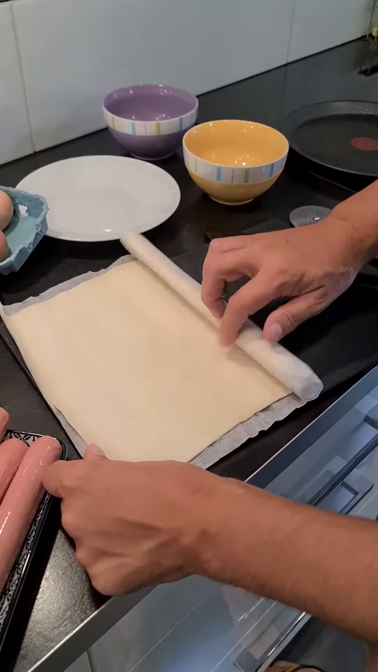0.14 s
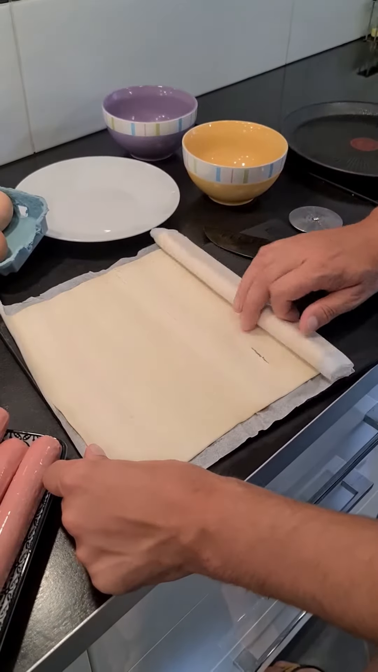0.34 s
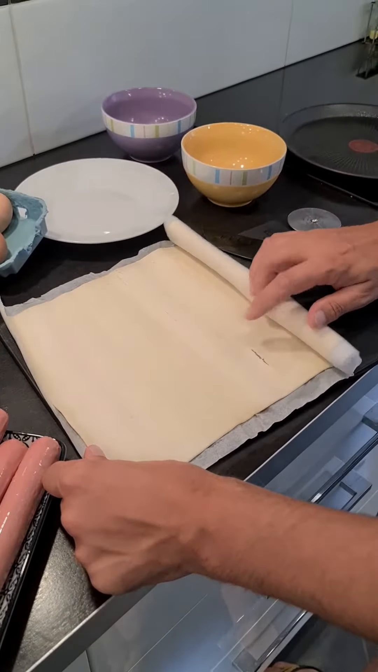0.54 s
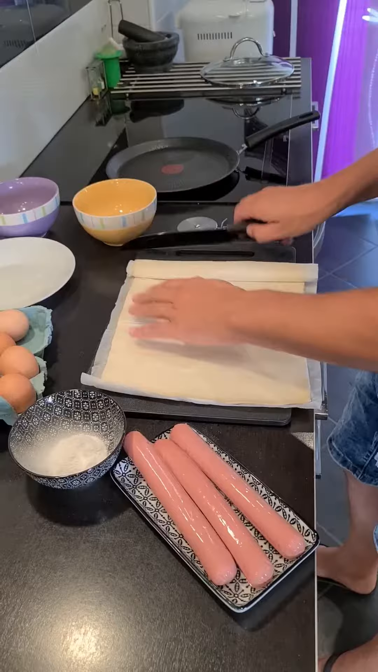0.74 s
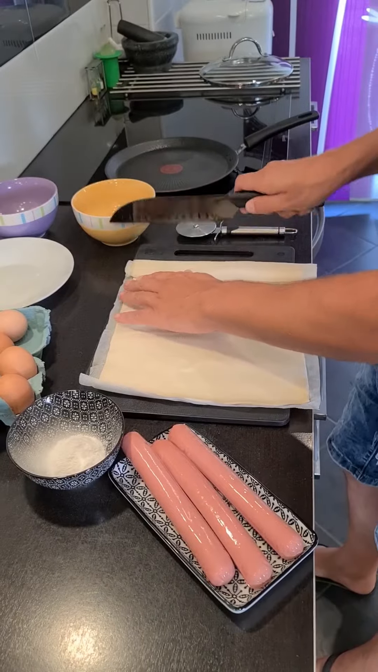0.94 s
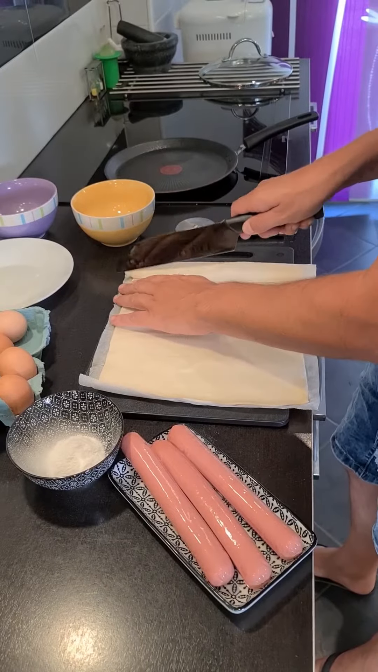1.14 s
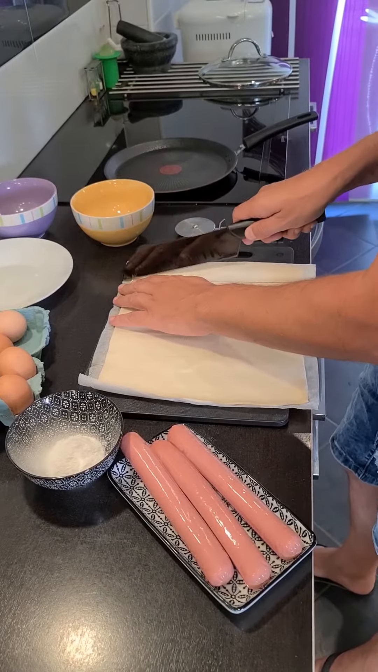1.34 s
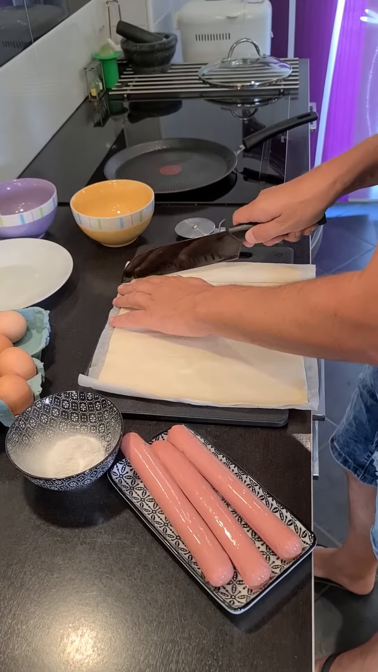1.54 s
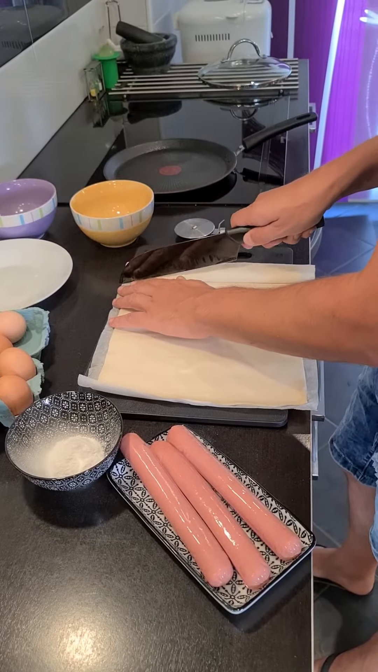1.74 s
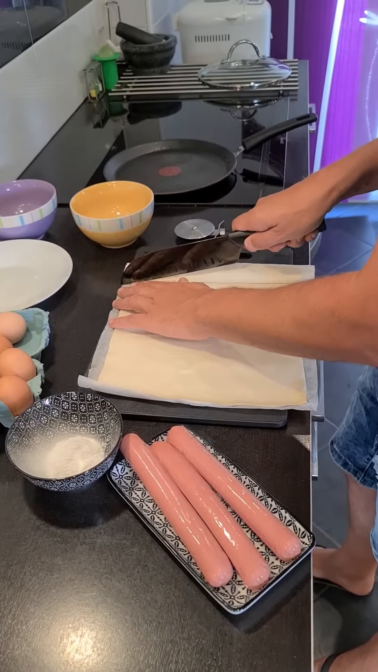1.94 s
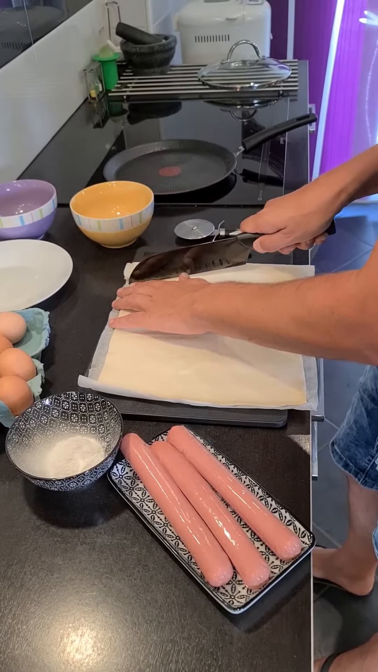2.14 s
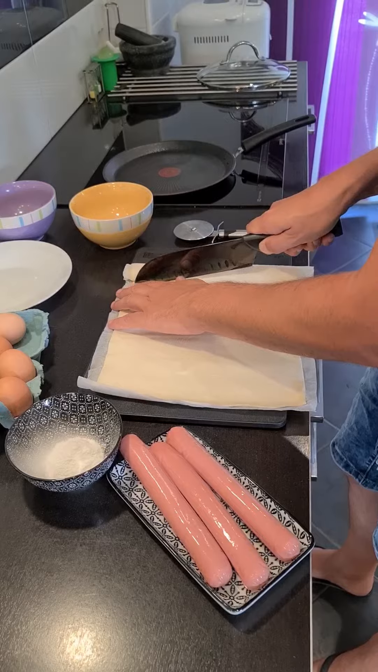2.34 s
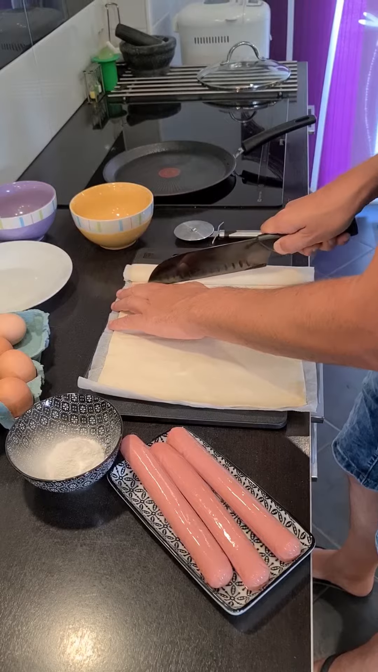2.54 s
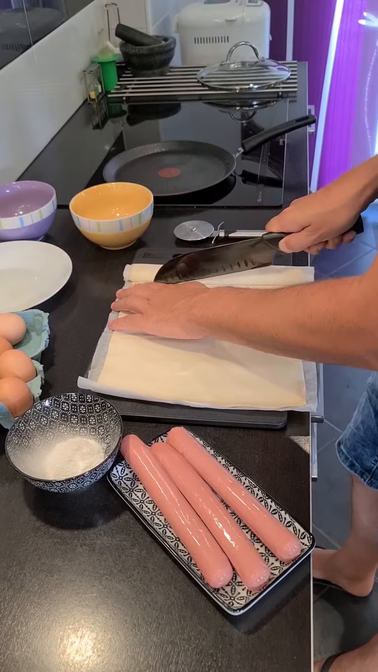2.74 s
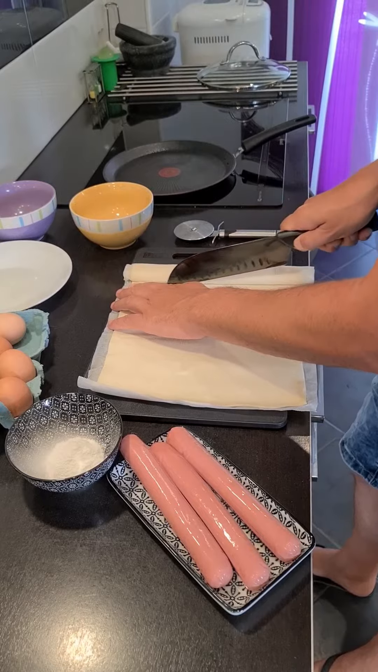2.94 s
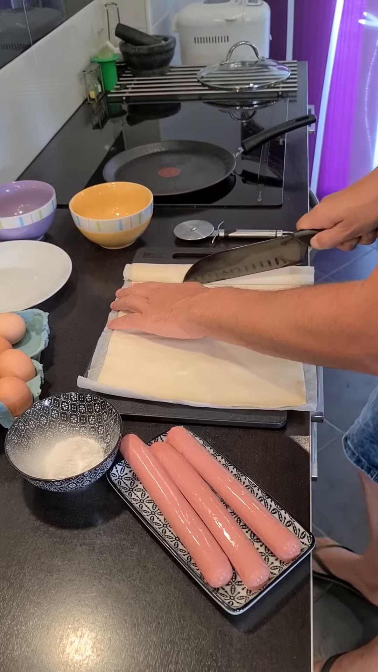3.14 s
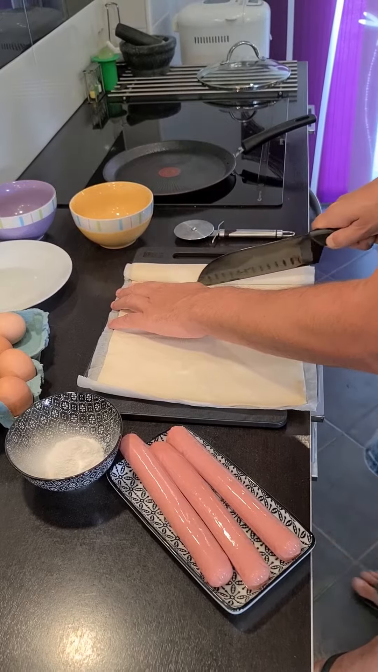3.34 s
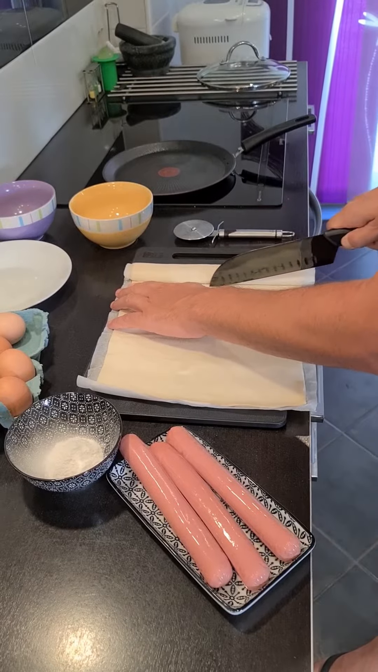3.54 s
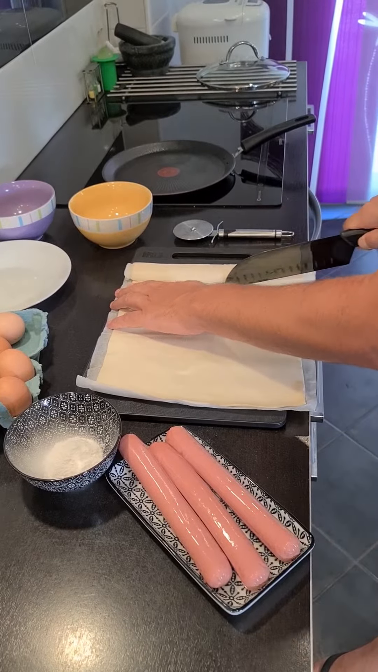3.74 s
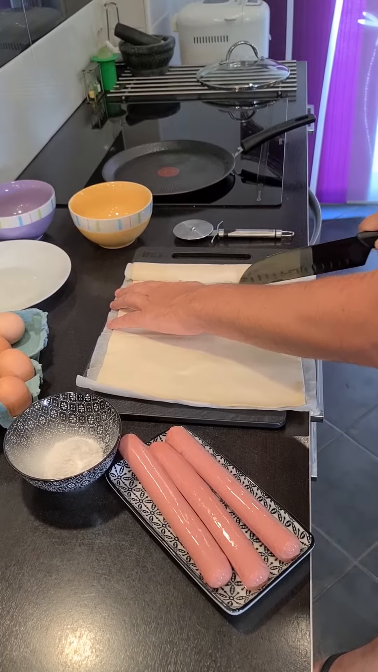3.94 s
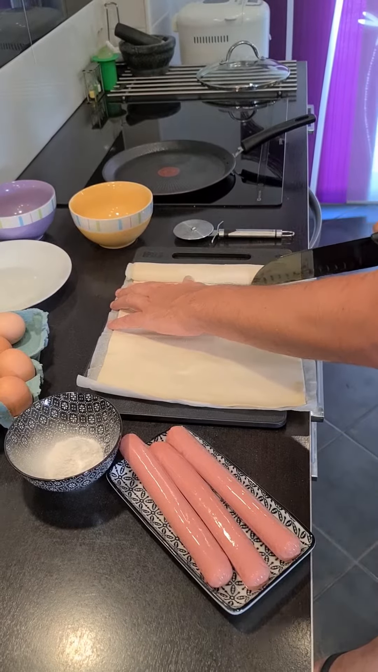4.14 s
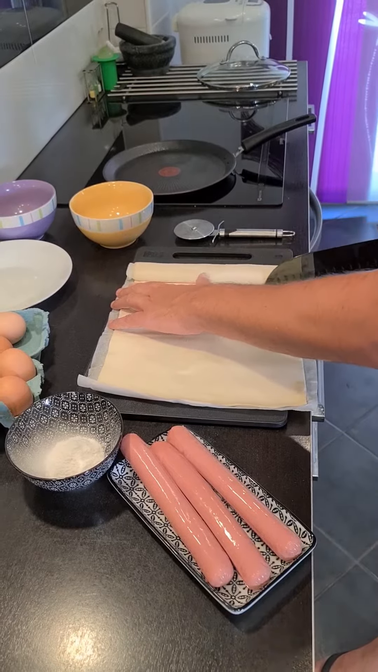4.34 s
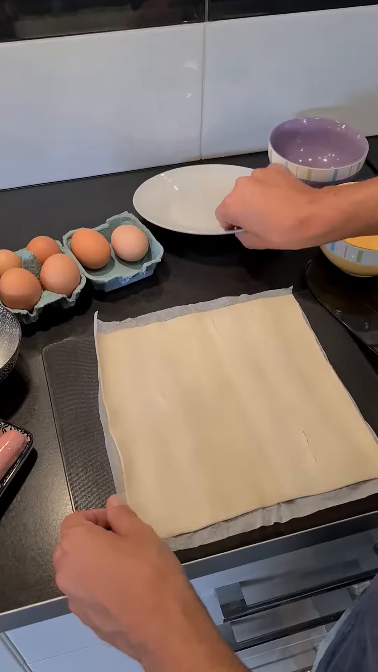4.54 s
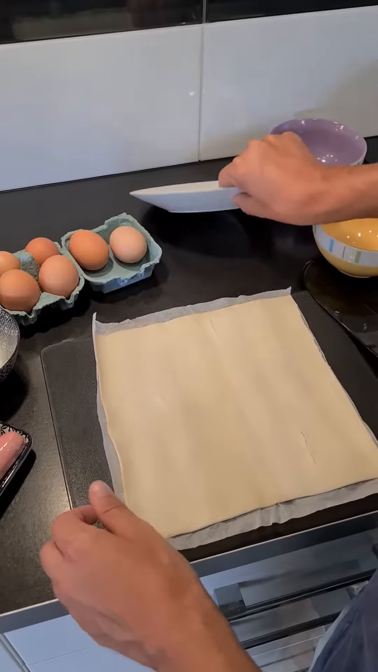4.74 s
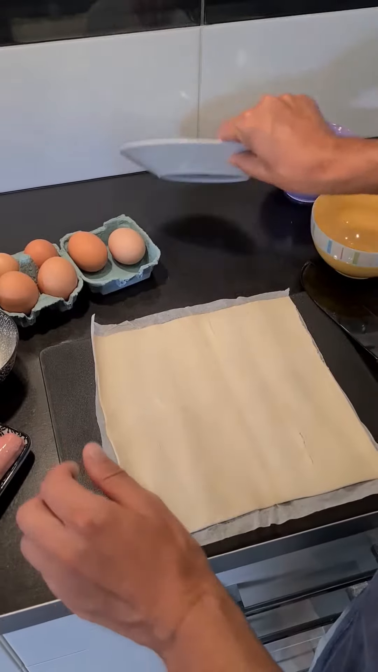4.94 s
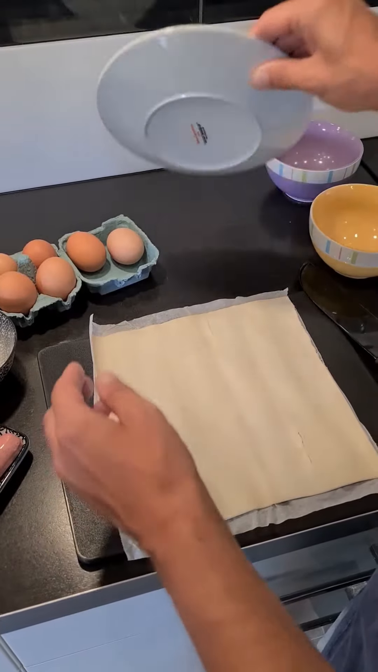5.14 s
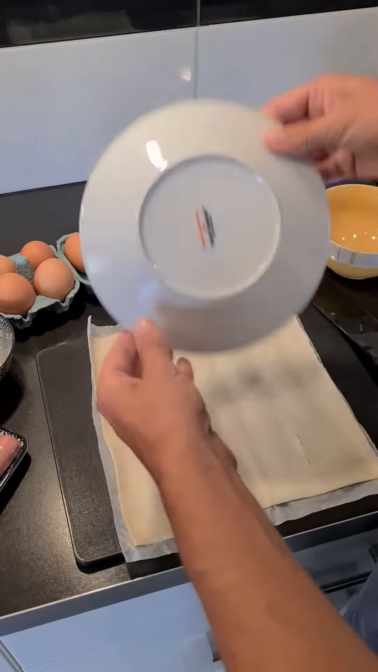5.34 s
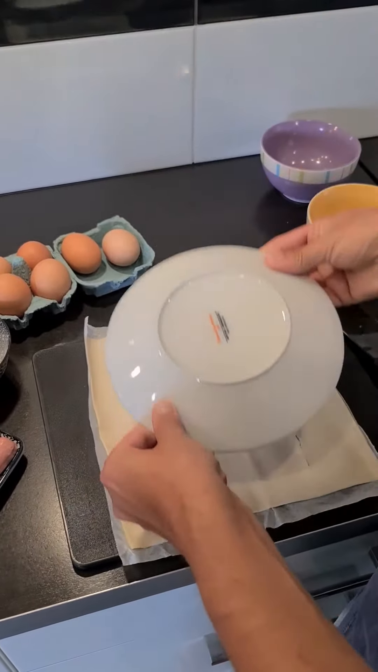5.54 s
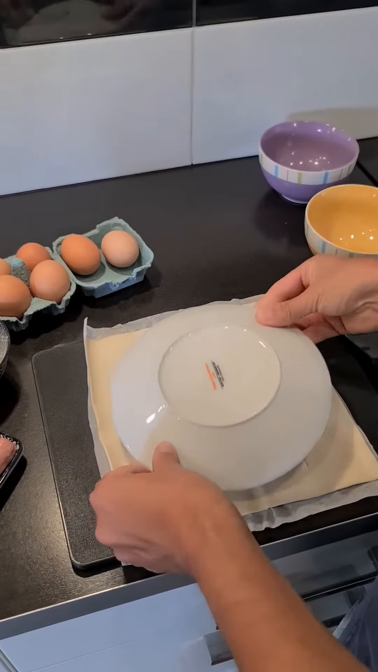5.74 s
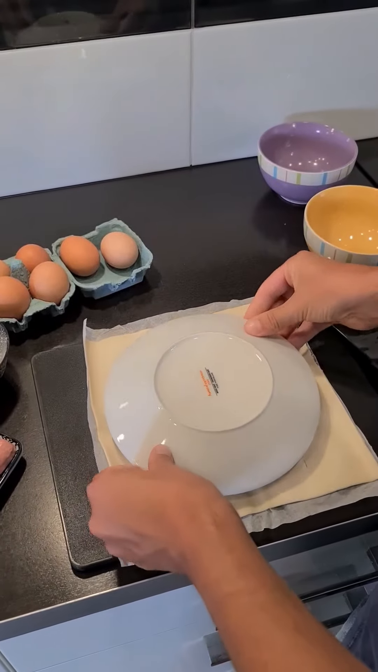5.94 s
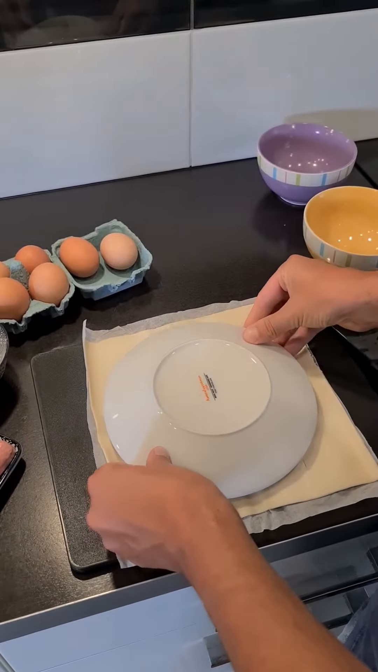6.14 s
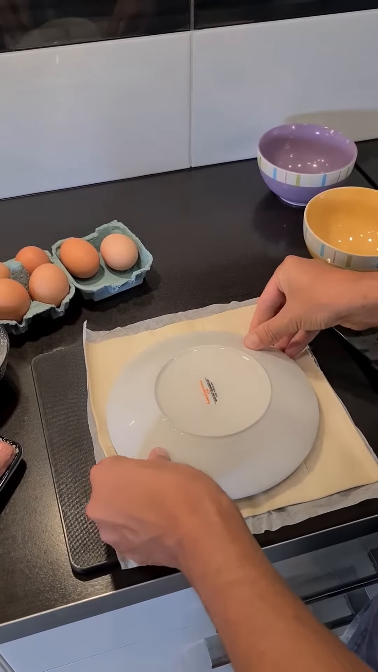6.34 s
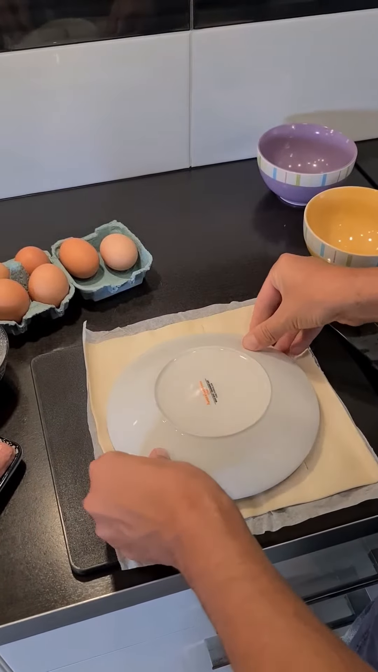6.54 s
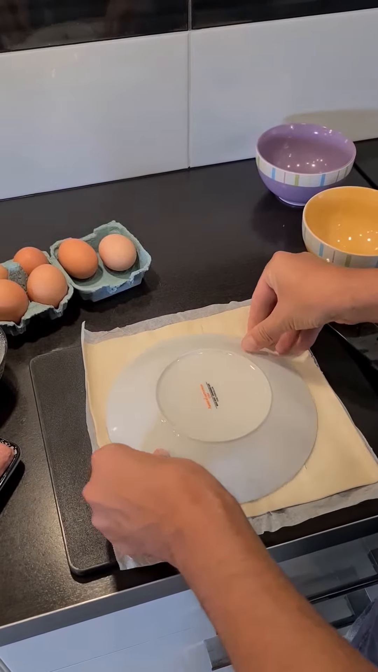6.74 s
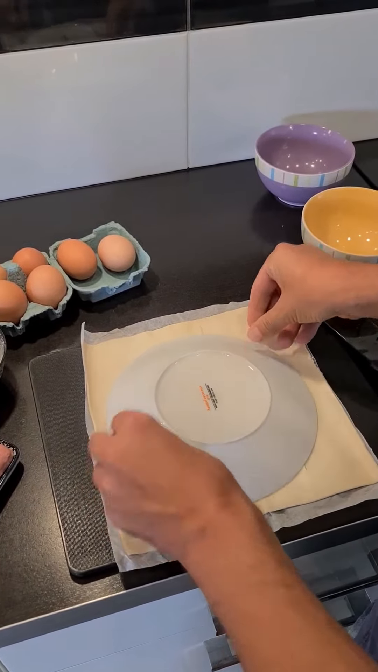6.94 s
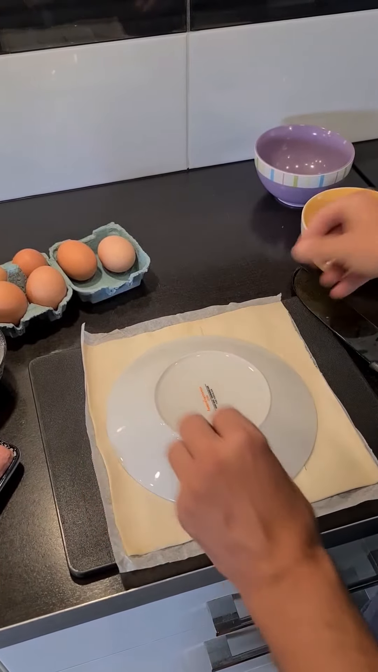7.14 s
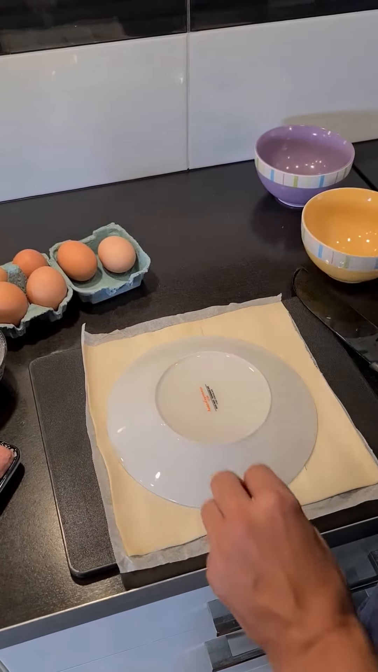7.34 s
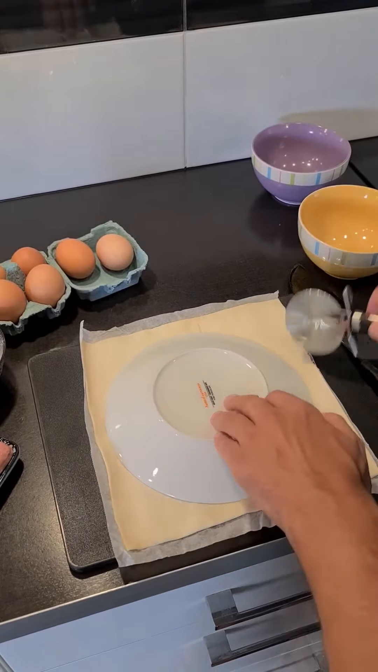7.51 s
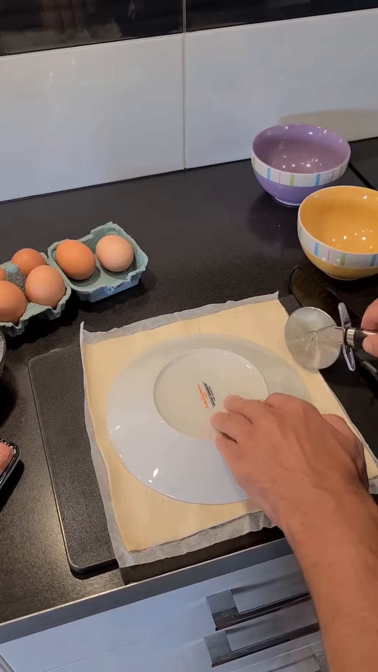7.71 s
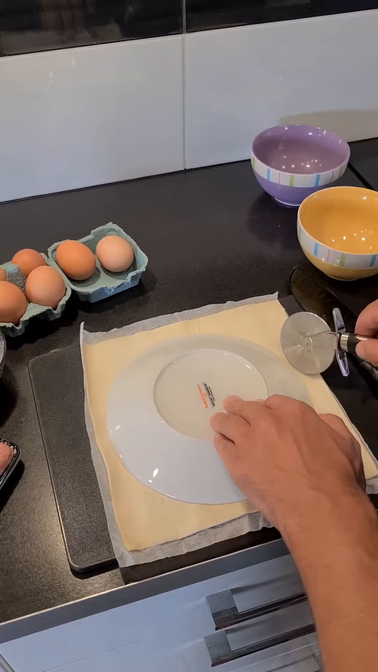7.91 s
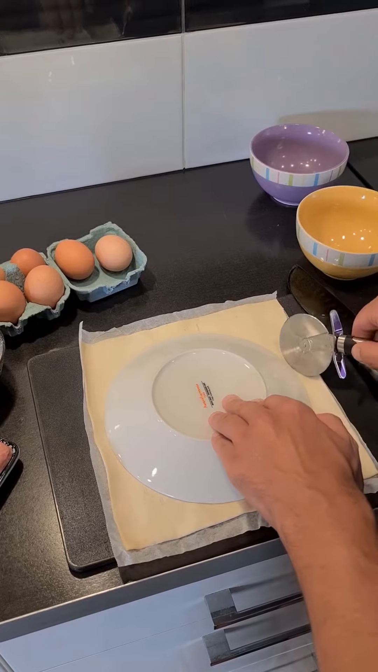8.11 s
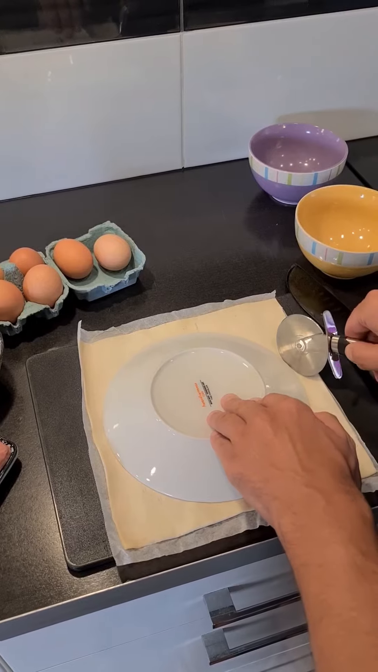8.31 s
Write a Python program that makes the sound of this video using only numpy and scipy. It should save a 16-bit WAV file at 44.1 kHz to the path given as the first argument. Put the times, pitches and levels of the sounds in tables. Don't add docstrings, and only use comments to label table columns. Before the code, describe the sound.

In a quiet tiled kitchen, paper rustles and snaps, a blade drags softly through dough, a plate clacks hard on the worktop, and a cutter wheel rattles lightly.

```python
import sys
import numpy as np
from scipy import signal
from scipy.fft import rfft, irfft
from scipy.io import wavfile
from scipy.ndimage import uniform_filter1d

SR = 44100
rng = np.random.default_rng(int(sys.argv[2]) if len(sys.argv) > 2 else 0)


def boost_factor(decibels):
    exponent = np.asarray(decibels, float) / 20
    return 10 ** exponent


def persist_wave(psi):
    counts = np.round(np.clip(psi, -1, 1) * 32767).astype(np.int16)
    wavfile.write(sys.argv[1], SR, np.atleast_2d(counts).T)


N = 369116

# start in seconds, level in dB, colour as pairs of Hz and dB per Hz.
TAKES = [
    (0, -60.5, [(24, -33), (40, -3), (189, -12.5), (337, -2.5), (630, -18.5), (1480, -25), (8130, -40), (12500, -39.5), (16000, -47)]),
    (.78, -63.5, [(24, -25), (40, -1), (71, -11.5), (101, -5), (226, -12.5), (283, -6), (444, -12.5), (680, -20.5), (1480, -23.5), (2570, -35), (2770, -29.5), (4800, -42.5), (16000, -47)]),
    (4.464, -66, [(24, -31.5), (40, -4), (101, -1), (209, -18), (237, 0), (269, -10.5), (337, -3.5), (556, -12), (1090, -16.5), (1950, -21.5), (2840, -21.5), (16000, -41.5)]),
    (7.43, -71, [(25, -33), (53, -31), (92, -9.5), (190, -36), (242, -6), (270, -17.5), (326, -16), (630, -24.5), (2000, -31), (2690, -31.5), (5430, -43), (7310, -46.5), (16000, -50)]),
]
# start in seconds, end in seconds, gain in dB.
GAPS = [
    (0.777, 0.785, -14),
    (4.435, 4.462, -38),
    (7.423, 7.434, -40),
]
# pitch in Hz, level in dB.
HUM = [(49.5, -70), (99, -71.5)]
HUM_LEVELS = [-0.5, 1.5, -4, -13.5]
# start in seconds, end in seconds, centre in Hz, width in Hz, level in dB.
DRONES = [(0, 8.37, 689, 14, -81), (.78, 4.44, 289, 15.5, -68), (4.46, 8.37, 240, 14, -75.5),
          (4.46, 8.37, 337.8, 22, -79.5)]
# frequency in Hz, correlation from -1 to 1.
LIKENESS = [(60, 0.84), (180, 0.63), (550, 0.16), (1650, -0.17), (4970, -0.22), (15000, -0.45)]
# frequency in Hz, t60 in seconds.
ROOM_DECAY = [(100, 0.5), (300, 0.41), (1000, .4), (3000, 0.39), (7000, 0.34), (14000, 0.15)]
# frequency in Hz, gain in dB.
MIC = [(20, -3.5), (6100, 0.5), (6500, -3), (6900, 1.5), (7800, -2.5), (8300, -6), (8900, 0), (15300, 3),
       (15900, -36.5)]

# frequency in Hz, level in dB per Hz.
DOUGH_DRAG = [(290, -32), (500, -11.5), (935, -10.5), (1110, -4.5), (1400, -9), (1940, -11), (2510, -13),
              (3510, -12.5), (3900, -17.5), (8000, -23), (10400, -55.5)]
# frequency in Hz, level in dB per Hz.
SKIN_HISS = [(2060, -36), (3500, -10), (4810, -3), (6200, -9.5), (8910, 1), (9930, -1.5), (14800, -9.5),
             (16000, -10)]
# frequency in Hz, level in dB per Hz.
PAPER_HISS = [(1500, -26), (2600, -14), (4200, -20), (6500, -21), (8000, -3.5), (8910, -0.5), (11000, -6),
              (14800, -8), (16000, -9)]
# peak, rise and fall in seconds, dough drag in dB, hiss in dB.
PAPER_STROKES = [
    (.098, 0.00694, 0.038, -62.5, -61),
    (0.3, 0.21, 0.071, -55, -65.5),
    (0.39, 0.020484, 0.09, -64, -69),
    (0.494, 0.035, 0.0177, -61, -47),
    (.135, .03, 0.041, -77, -73.5),
    (0.27, .05, 0.055, -66.5, -75),
    (0.42, .09, 0.055, -74, -65),
    (.62, .2, 0.16, -65, -59),
    (.763, .012, 0.027, -67.5, -55),
    (0.7, 0.13, 0.024, -63, -80),
]
# peak, rise and fall in seconds, drag in dB, hiss in dB.
HANDLE_STROKES = [
    (.796, .012, 0.022, -53.5, -71),
    (1.249, .3, .05, -87, -86),
    (1.288, .012, 0.09, -58, -55),
    (1.327, .015, 0.055, -54, -46.5),
    (1.433, 0.014, 0.06, -67.5, -66),
]
# peak, rise and fall in seconds, dough drag in dB, hiss in dB.
SAW_STROKES = [
    (2.47, .2, 0.21, -67, -84),
    (2.89, .07, .2, -67, -86),
    (3.08, .3, 0.48, -66.5, -77),
    (3.78, .45, .4, -66, -72.5),
    (4.3, 0.421, 0.35, -72, -82.5),
]
# peak, rise and fall in seconds, drag in dB, hiss in dB.
PALM_STROKES = [
    (7.22, .35, 0.53, -96, -78),
]
# pan in dB, smoothness, roundness of the swell,
# resonance width in Hz, resonance share.
FEEL = [(-7.5, 1.14, 1.22, 350, 0.086), (-7.5, 3.15, 1.05, 650, 0.96), (-5, 1.7, 1.9, 100, 0.72),
        (-20.5, 2.5, 1, 800, .2)]
# pitch in Hz at the first stroke, climb in Hz per second.
BOARD_NOTE = [(1392.8, 3000), (3220, -900), (1010, 165.5), (3000, 0)]

# time in seconds, peak in dB, centre in Hz, pan in
# dB.
SNAPS = [(0.097, -53.5, 2850, -2), (0.2123, -54.5, 1220, 3), (0.2635, -51, 1243, 4), (0.2908, -56, 2620, 5),
         (0.3962, -53.5, 1930, 0.5), (0.491, -47, 8880, -8.5), (0.648, -55, 1198, 1.5),
         (0.7011, -47.5, 1800, -2), (0.7559, -38.5, 1940, -1), (0.7621, -33.5, 1670, 0),
         (0.793, -47, 1820, 1), (1.8702, -60.5, 4900, -2.5), (2.3449, -59.5, 4600, -4),
         (2.4899, -61, 1520, -7), (2.9142, -58, 1510, -2.5), (3.1129, -54.5, 3470, -10),
         (6.7413, -46.5, 1570, -2.0), (6.7526, -46.5, 4250, -2), (6.746, -54.5, 10490, -10)]
# time in seconds, peak in dB, centre in Hz, pan in dB.
CRACKLES = [(.1805, -64.5, 2790, -1.5), (.229, -55, 5000, -3), (.2345, -55, 1600, -2),
            (.272, -56, 2200, -2), (.292, -58, 6000, -3), (.302, -59, 2500, -2), (.331, -58, 4000, -3),
            (.389, -57.5, 3500, -4), (.4734, -58, 2700, -3.5), (.4734, -59, 11700, -8),
            (.4945, -50.5, 2650, -4), (.632, -60, 1800, -2), (0.74, -53, 2750, -2.5)]
# time in seconds, peak in dB, centre in Hz.
SCUFFS = [
    (1.281, -59, 3350),
    (1.322, -48, 1859),
    (1.3464, -42, 3030),
    (1.4295, -53.5, 2780),
    (3.264, -54.5, 3370),
]
# time in seconds, peak in dB, pitch in Hz, pan in dB.
BLADE_TAPS = [
    (2.064, -60, 1440, 8),
    (2.144, -59, 1750, 0.5),
    (2.2641, -69.5, 1504, 7.5),
    (3.52, -55, 1440, 1),
]
# time in seconds, peak in dB, pitch in Hz.
THUMPS = [(0.312, -42.5, 160.3), (0.756, -40.5, 320), (0.764, -40, 78.5), (0.794, -45, 676),
          (1.444, -53.5, 344), (4.717, -34.5, 171.3), (4.722, -54, 72), (6.744, -43.5, 535.4),
          (6.759, -46.5, 162.7), (7.377, -61, 310), (7.44, -57, 303)]
# peak in seconds, level in dB, pitch in Hz, rise in seconds, fall in seconds.
SINGING_STEEL = [
    (.83, -61, 7310, 0.041, .045),
    (1.45, -76.5, 6770, 0.0204, 0.09),
    (8.136, -75.5, 4430, 0.0224, 0.0297),
]

# time in seconds, peak in dB, hardness in Hz, then ring, boom, clack and crack in dB.
KNOCKS = [(4.4659, -39, 5000, -21, -5, -22, -6), (4.4857, -38, 9000, -27, -18, -20, -6),
          (4.5, -22, 6000, -26, -24, -14, -5), (4.5064, -16.5, 14000, -26, -20.5, -14, -4),
          (4.5126, -19, 3000, -26, -21.5, -12, -6), (4.5815, -13.5, 1099, -16.5, -2, -10, -4),
          (4.6075, -12.5, 9000, -3.5, -1, -15, -14), (4.612, -21, 5000, -12, -5, -12, -10),
          (4.627, -25, 700, -20.5, 8, -30, -8), (4.7166, -4.5, 10000, -19, -11, -5, -3),
          (4.728, -13, 12120, -18, -8, -7, -4), (4.741, -19.5, 9050, -17, -8, -8, -4)]
# mode in Hz, level in dB, t60 in seconds.
PLATE_DOWN = [(635, -11, 0.086), (700, -9.5, .12), (768, -8, 0.14), (1181, 3, .15), (1400, -17, .12),
              (1517, -10, .2), (2400, -25.5, .2), (2732.5, -17, .2), (3045, -16, .18), (3370, -22, 0.37),
              (4470, -24, 0.22), (5442, -25, .1), (5950, -31, .2), (7360, -37, .2)]
# mode in Hz, level in dB, t60 in seconds.
PLATE_UP = [(615, -10, .14), (714.1, -3, .16), (790, -5, .16), (1117, -10, .18), (1279.7, -10, .14),
            (2770, -15, .4), (2731, -14, .48), (3360, -15, .35), (1865, -14, .22), (4530, -19, .38),
            (5850, -20, .38), (2034, -18, .15), (7330, -27, 0.31), (8680, -27, .3)]
# mode in Hz, level in dB, t60 in seconds.
GLAZE = [(6897, -36, .15), (7500, -36, .15), (8600, -35, .2), (8910, -35, .15), (9360, -37, .15),
         (10800, -39, .15), (11395, -39, .15), (12100, -40, .12), (13000, -41, .12), (14300, -42, .08)]
# mode in Hz, level in dB, t60 in seconds.
WORKTOP = [(240, -18.5, .12), (300, -8.5, 0.24), (339.1, -8, 0.16), (352, -5.5, .2), (376, -13, .3),
           (440, -16, .15), (570.6, -15.5, 0.092)]
# mode in Hz, level in dB, t60 in seconds.
CLACK = [(705, -0.5, 0.028), (1267, -5.5, .04), (1857, -7, 0.029), (2046.6, -12, .04), (2730, -5.5, .05),
         (3450, -16, 0.031), (4376, -16.5, .05), (5367, -24, .026), (6100, -23, .02)]
# frequency in Hz, level in dB per Hz.
CRACK = [(100, -19.5), (300, -8.5), (750, 1), (1500, -1.5), (3000, -15), (6000, -23.5), (12000, -32.5),
         (15500, -36.5)]
# frequency in Hz, level in dB per Hz.
SHIMMER = [(500, -2), (1200, 0), (2200, -5), (3300, -5), (6000, -14), (8000, -24), (9000, -19),
           (15000, -28)]
# peak, rise and fall in seconds, level in dB.
SCRAPES = [
    (4.47, .004, 0.099, -49.5),
    (4.503, 0.00588, 0.028, -27),
    (4.513, .014, 0.0123, -24),
    (4.545, .06, 0.081, -33),
    (4.604, 0.0893, .004, -41),
]
# frequency in Hz, level in dB per Hz.
STONE_GRIT = [(88, -65), (150, -31.5), (328, 5.5), (484, -11.5), (649, -0.5), (923, -10), (2760, -20.5),
              (5910, -42.5), (10000, -36), (15100, -51.5), (16000, -72)]
# peak, rise and fall in seconds, level in dB.
FINGERS = [
    (5.38, 0.036, 0.033, -64.5),
    (5.566, 0.022, 0.06, -70),
    (5.66, .5, 0.21, -74.5),
]
# time in seconds, peak in dB, nearest mode in Hz, loss in dB per octave from it.
NAILS = [
    (5.3397, -55, 5900, 26),
    (5.3617, -59, 8800, 8),
    (5.3727, -55.5, 4500, 10),
    (5.556, -55, 3000, 4),
    (5.5647, -47, 3500, 3),
    (5.685, -49, 1100, 3),
    (6.0426, -57, 4470, 9),
    (6.165, -60, 1500, 8),
    (6.195, -59, 2700, 1),
    (6.368, -60, 1300, 10),
]
# mode in Hz, width in Hz, level in dB.
HELD_PLATE = [(808, 87, -7), (1533, 73, -5.5), (2700, 41, -2), (3350, 30.6, -5), (4430, 54, -12),
              (4515, 39, 0), (5815, 56, -1.5), (6855, 80, -10.5), (7260, 60, -5.5), (8560, 100, -5),
              (8810, 63, -4), (9400, 44.6, -7.5), (10720, 90, -8.5), (12600, 150, -13.5)]
# frequency in Hz, left minus right in dB.
PLATE_LEAN = [(60, 1.5), (150, -2.5), (380, 1), (950, 5), (2380, 0), (5980, -4.5), (15000, -7)]
# frequency in Hz, lead in radians.
PLATE_LEAD = [(100, .1), (300, .25), (700, .7), (1400, 1.3), (3000, 1.7), (8000, 1.7)]
# time in seconds, peak in dB, centre in Hz, pan in dB.
SETTLE = [
    (6.7435, -49, 780, 3),
    (6.747, -53, 1500, -1),
    (6.7505, -57, 4800, -3),
    (6.755, -55, 3400, -2),
    (6.762, -57, 900, 0),
]

# peak, rise and fall in seconds, level in dB, freedom of the wheel to ring.
SLIDES = [
    (7.394, 0.01297, 0.086, -53.5, 1.1),
    (7.45, 0.0306, 0.021, -53.5, 1.3),
    (7.478, 0.03, 0.029, -64, 0.9),
    (7.508, .006, 0.041, -63, 0.29),
    (7.531, 0.038, 0.016, -59.5, 0.3),
    (7.592, .012, .012, -58, 0.33),
    (7.635, .02, 0.0294, -71, .3),
    (7.7, .015, 0.042, -73, 0.39),
    (8.358, 0.023, 0.017, -58, 0.464),
]
# time in seconds, peak in dB, pitch in Hz, pan in dB.
CLINKS = [(7.5345, -50, 3330, -3), (7.534, -44.5, 8200, -10), (7.5904, -49.5, 3360, -3.5),
          (7.5907, -48, 11000, -6.5), (7.5915, -52, 13000, -4), (7.6253, -59.5, 4430, -7.5),
          (7.641, -61.5, 2300, -5), (7.6944, -60, 4510, -8), (7.6944, -61, 2900, -6.5),
          (7.7154, -63, 5200, -8), (8.1333, -65.5, 2920, -5), (8.1333, -68, 12300, -5),
          (8.2443, -55, 2710, -4), (8.2442, -58, 4940, -4), (8.3558, -43, 4930, -1),
          (8.3554, -42, 2700, -3.5), (8.3554, -46, 12200, -5), (8.3558, -46, 5600, -2)]
# mode in Hz, width in Hz, level in dB.
WHEEL = [(2725, 14.8, 8), (3800, 64, -25), (5800, 90, -20), (7620, 118, -11.5), (11490, 81, -14),
         (12680, 180, -28)]
# frequency in Hz, level in dB per Hz.
STEEL_GRIT = [(1000, -4), (2200, -14.5), (3000, 4.5), (5000, 0.5), (8000, -6), (12000, -8.5), (15500, -15)]

FIRST_CUT_S = .779
SNAP_T60 = 0.029
LIFT_S = 4.7


def evened(x):
    return x / np.sqrt(np.mean(x ** 2) + 1e-20)


def read(points, hz):
    f, value = np.transpose(points)
    return np.interp(np.log(hz + 1), np.log(f + 1), value)


def add(mix, s, sound, pan_db=0):
    end = round(FIRST_CUT_S * SR) if s < FIRST_CUT_S - .008 else N
    part = mix[:, round(s * SR):end][:, :sound.shape[-1]]
    sides = boost_factor(np.array([[.5], [-.5]]) * pan_db)
    part += (sound * sides)[:, :part.shape[1]]


def colour(x, points):
    gain_db = np.maximum(read(points, abs(np.fft.fftfreq(4096, 1 / SR))), -100)
    log_gain = np.log(10) / 20 * gain_db
    taps = np.fft.ifft(np.exp(np.conj(signal.hilbert(log_gain)))).real[:2048]
    return signal.oaconvolve(x, taps / np.linalg.norm(taps))[:len(x)]


def ring(x, modes):
    out = 0
    for hz, width, db in modes:
        r = np.exp(-np.pi * width / SR)
        poles = [1, -2 * r * np.cos(2 * np.pi * hz / SR), r * r]
        out = out + boost_factor(db) * (1 - r) * signal.lfilter([1, 0, -1], poles, x)
    return out


def modal(modes, t, longest=.5, flutter_db=4.5):
    wavers = uniform_filter1d(rng.standard_normal((len(modes), len(t))), 600)
    skews = rng.uniform(-1, 1, len(modes))[:, None, None] * np.array([[.5], [-.5]])
    out = 0
    for (hz, db, t60), waver, skew in zip(modes, wavers, skews):
        fade = boost_factor(db - 60 * t / min(t60, longest) + flutter_db * evened(waver))
        phase = skew * np.pi * hz / (hz + 1500)
        out = out + fade * np.sin(2 * np.pi * hz * t + phase)
    return out


def grains(size, per_s, spread_db, smooth):
    heights = boost_factor(spread_db * np.minimum(rng.exponential(1, size), 3.5))
    clicks = heights * (rng.random(size) < per_s / SR) * rng.standard_normal(size)
    return evened(evened(clicks) + smooth * rng.standard_normal(size))


def stroke(peak, rise, fall, roundness=1):
    span = 1.45
    t = np.arange(-min(span * rise, peak), span * fall, 1 / SR)
    return peak + t[0], boost_factor(-20 * abs(t / np.where(t < 0, rise, fall)) ** roundness)


def snap(db, hz, t60, sharp, noisy, reach, spike):
    n = np.arange(3000)
    t = n / SR
    middle, side = rng.standard_normal((2, 3000)) * boost_factor(-60 * t / t60) * np.minimum(t / 0.0011, 1)
    puff = middle + 0.82 * np.array([side, -side]) + spike * (n == 30)
    band = [hz / max(reach, 1.1), min(0.81 * reach * hz + 500, 16000)]
    wide = signal.lfilter(*signal.butter(3, band, "band", fs=SR), puff)
    sound = evened(ring(wide, [(hz, hz / sharp, 0)])) + noisy * evened(wide)
    return boost_factor(db) * sound / abs(sound.mean(0)).max()


def room_tone():
    frames, hz = N // 512 + 5, np.fft.rfftfreq(2048, 1 / SR)
    a, b, c, d, patches = rng.standard_normal((frames, 1025, 5)).T
    patches = evened(uniform_filter1d(uniform_filter1d(patches, 14, 0), 6, 1))
    same = np.clip(read(LIKENESS, hz), -1, 1)[:, None]
    left = a + 1j * b
    right = same * left + np.sqrt(1 - same ** 2) * (c + 1j * d)
    z = np.array([left, right]) * boost_factor(1.2 * patches)
    out = np.zeros((2, N))
    for (start, db, shape), (end, *_) in zip(TAKES, TAKES[1:] + [(N / SR,)]):
        first, last = round(start * SR), round(end * SR)
        part = z[:, :, first // 512:last // 512 + 5] * boost_factor(read(shape, hz))[:, None]
        noise = signal.istft(part, nperseg=2048, noverlap=1536)[1][:, :last - first]
        out[:, first:last] = boost_factor(db) * evened(noise)
    return out


def fridge_hum():
    t = np.arange(N) / SR
    take = np.searchsorted([row[0] for row in TAKES], t, "right") - 1
    waver_db = 1.5 * evened(uniform_filter1d(rng.standard_normal(N), 6000))
    tones = sum(boost_factor(db) * np.sqrt(2) * np.sin(2 * np.pi * hz * t) for hz, db in HUM)
    return boost_factor(np.take(HUM_LEVELS, take) + waver_db) * tones


def drones():
    t = np.arange(N) / SR
    out = np.zeros(N)
    for start, end, hz, width, db in DRONES:
        panel = evened(ring(rng.standard_normal(N), [(hz, width, 0)]))
        out += boost_factor(db) * panel * ((t > start) & (t < end))
    return out


def rubs(mix):
    kinds = [PAPER_STROKES, HANDLE_STROKES, SAW_STROKES, PALM_STROKES]
    hisses = [PAPER_HISS, SKIN_HISS, SKIN_HISS, SKIN_HISS]
    for rows, feel, (first_hz, climb), hiss in zip(kinds, FEEL, BOARD_NOTE, hisses):
        pan_db, smooth, roundness, width, share = feel
        for peak, rise, fall, drag_db, hiss_db in rows:
            start, gain = stroke(peak, rise, fall, roundness)
            size = len(gain)
            note = [(first_hz + climb * (peak - rows[0][0]), width, 0)]
            pressure = boost_factor(1.8 * evened(uniform_filter1d(rng.standard_normal(size), 500)))
            layers = []
            for _ in range(3):
                slips = grains(size, 700, 3.5, smooth)
                drag = colour(slips, DOUGH_DRAG) + share * evened(ring(slips, note))
                bright = colour(grains(size, 2500, 2.6, 1.5 * smooth), hiss)
                layers.append(boost_factor(drag_db) * drag + boost_factor(hiss_db) * bright)
            both, left, right = layers
            add(mix, start, gain * pressure * (0.37 * both + 0.35 * np.array([left, right])), pan_db)


def ticks(mix):
    for s, db, hz, pan_db in SNAPS:
        add(mix, s, snap(db, hz, SNAP_T60, sharp=5.3, noisy=1.0, reach=2.24, spike=3.9), pan_db)
    for s, db, hz, pan_db in CRACKLES:
        add(mix, s, snap(db, hz, 0.014, sharp=3.0, noisy=1.2, reach=2.8, spike=4.7), pan_db)
    for s, db, hz in SCUFFS:
        add(mix, s, snap(db, hz, 0.11, sharp=11.3, noisy=1.6, reach=2.7, spike=1.5), -2)
    for s, db, hz, pan_db in BLADE_TAPS:
        add(mix, s, snap(db, hz, SNAP_T60, sharp=11.2, noisy=0.32, reach=1.43, spike=3.5), pan_db)


def thumps(mix):
    t = np.arange(9000) / SR
    for s, db, hz in THUMPS:
        lumps = signal.lfilter(*signal.butter(3, 2.17 * hz, fs=SR), rng.standard_normal(9000))
        fade = boost_factor(db - 60 * t / 0.059 * (hz / 300) ** 0.2)
        add(mix, s, fade * (np.sin(2 * np.pi * hz * t) + 0.79 * evened(lumps)) * np.minimum(t / 0.0019, 1))


def singing(mix):
    for peak, db, hz, rise, fall in SINGING_STEEL:
        start, swell = stroke(peak, rise, fall, 1.6)
        t = np.arange(len(swell)) / SR
        add(mix, start, boost_factor(db) * swell * np.sin(2 * np.pi * hz * t), -2.5)


def plate_knocks(mix):
    t = np.arange(SR // 2) / SR
    down, up = modal(PLATE_DOWN, t), modal(PLATE_UP, t)
    boom = modal(WORKTOP, t, flutter_db=2.5) * (1 - np.exp(-t / .0044))
    clack, glaze = modal(CLACK, t, .05), modal(GLAZE, t)
    for s, db, hard_hz, ring_db, boom_db, clack_db, crack_db in KNOCKS:
        free, sparkle = (0.9, 3.0) if s > LIFT_S else (0.061, 1)
        choke = boost_factor(-60 * np.maximum(t - max(LIFT_S - s, 0), 0) / 0.061)
        tone = (1 - free) * down * choke + free * up + sparkle * glaze
        tone = tone * (1 - np.exp(-t / .002))
        crack = colour(rng.standard_normal(len(t)) * boost_factor(-60 * t / 0.011), CRACK)
        sound = boost_factor(ring_db) * tone + boost_factor(boom_db) * boom + boost_factor(clack_db) * clack
        sound += boost_factor(crack_db) * crack / abs(crack).max()
        shimmer = np.array([colour(x, SHIMMER) for x in rng.standard_normal((2, len(t)))])
        sound += boost_factor(-26.5 + 5 + .5 * crack_db - 60 * t / .22) * shimmer
        add(mix, s, boost_factor(db) * signal.lfilter(*signal.butter(2, min(hard_hz, 16000), fs=SR), sound))


def plate_scrapes(mix):
    opening = TAKES[2][0]
    for peak, rise, fall, db in SCRAPES:
        start, drag = stroke(peak, rise, fall)
        sound = boost_factor(db) * drag * colour(grains(len(drag), 1500, 3.4, 0.97), STONE_GRIT)
        skip = max(round((opening - start) * SR), 0)
        add(mix, max(start, opening), sound[skip:])


def plate_fingers(mix):
    for peak, rise, fall, db in FINGERS:
        start, touch = stroke(peak, rise, fall, 1.35)
        rub = ring(grains(len(touch), 600, 2.6, 0.72), HELD_PLATE[3:])
        add(mix, start, boost_factor(db) * touch * evened(rub))


def plate_nails(mix):
    t = np.arange(6000) / SR
    for s, db, near_hz, loss_db in NAILS:
        tick = rng.standard_normal(6000) * boost_factor(-60 * t / 0.016)
        tick = signal.lfilter(*signal.butter(2, min(2.2 * near_hz, 15000), fs=SR), tick)
        modes = [(hz, 1.16 * width, mode_db - loss_db * abs(np.log2(hz / near_hz)))
                 for hz, width, mode_db in HELD_PLATE]
        tap = ring(tick, modes)
        tap = tap / abs(tap).max() + .15 * ring(tick, [(near_hz, near_hz, 0)]) / 2
        add(mix, s, boost_factor(db) * tap / abs(tap).max())


def placed(x):
    hz = np.fft.rfftfreq(N, 1 / SR)
    step = np.sqrt(boost_factor(read(PLATE_LEAN, hz))) * np.exp(.5j * read(PLATE_LEAD, hz))
    return irfft(rfft(x) * np.array([step, 1 / step]), N)


def settling(mix):
    for s, db, hz, pan_db in SETTLE:
        add(mix, s, snap(db, hz, SNAP_T60, sharp=9.9, noisy=.4, reach=1.44, spike=1.5), pan_db)


def cutter(mix):
    for peak, rise, fall, db, free in SLIDES:
        start, drag = stroke(peak, rise, fall, 1.3)
        both, left, right = (grains(len(drag), 2500, 3.2, 1.0) for _ in range(3))
        grit = np.array([colour(both + 2.6 * side, STEEL_GRIT) for side in (left, right)])
        shaken = free * evened(ring(both, WHEEL)) + 0.34 * grit
        add(mix, start, boost_factor(db) * drag * evened(shaken), -4.5)
    for s, db, hz, pan_db in CLINKS:
        tick = snap(db, hz, 0.0143, sharp=16.0, noisy=0.37, reach=2.125, spike=3.9)
        loose = .2 if s < 8 else .03
        add(mix, s, tick + loose * ring(tick, WHEEL), pan_db)


def kitchen(x):
    taps = np.zeros((2, SR // 2))
    at = np.arange(260, SR // 2 - 20, 20) + rng.integers(0, 20, (2, (SR // 2 - 261) // 20))
    np.put_along_axis(taps, at, rng.choice([-1., 1.], at.shape), 1)
    hz, t, z = signal.stft(taps, SR, nperseg=256)
    same = 1 / (1 + (hz[:, None] / 900) ** 2)
    z[1] = same * z[0] + np.sqrt(1 - same ** 2) * z[1]
    tail = signal.istft(z * boost_factor(-60 * t / read(ROOM_DECAY, hz)[:, None]), SR, nperseg=256)[1]
    tail = tail / np.linalg.norm(tail[0])
    parts = np.split(x.mean(0), [round(FIRST_CUT_S * SR)])
    return np.hstack([signal.fftconvolve(part[None], tail, axes=1)[:, :len(part)] for part in parts])


def scene():
    near, china, unechoed = np.zeros((3, 2, N))
    rubs(near)
    ticks(near)
    thumps(near)
    singing(unechoed)
    plate_knocks(china)
    plate_scrapes(china)
    plate_fingers(china)
    plate_nails(china)
    settling(unechoed)
    cutter(near)
    china = signal.sosfilt(signal.butter(3, 215, "high", fs=SR, output="sos"), china)
    echoes = kitchen(boost_factor(-8.5) * near + boost_factor(-7.0) * china)
    return near + unechoed + placed(china) + echoes + room_tone() + fridge_hum() + drones()


def roll_off(x):
    return signal.sosfilt(signal.butter(12, 16470, fs=SR, output="sos"), x)


def record(dry):
    t = np.arange(N) / SR
    dip_db = sum(db * ((t > start) & (t < end)) for start, end, db in GAPS)
    heard = np.array([colour(side, MIC) for side in dry])
    return roll_off(heard * uniform_filter1d(boost_factor(dip_db), 40))


dry = scene()
out = record(dry)
persist_wave(out)
```